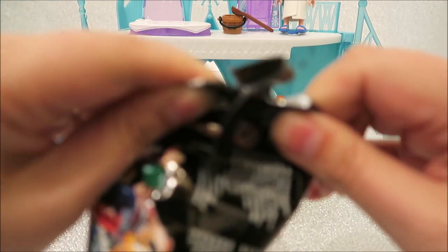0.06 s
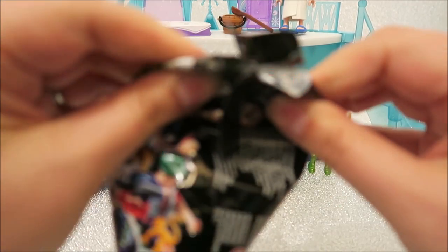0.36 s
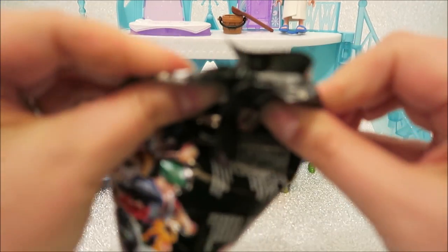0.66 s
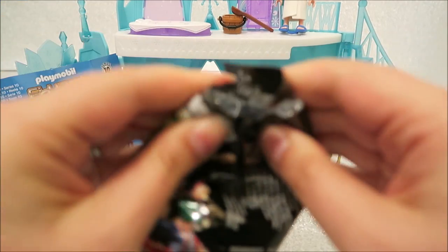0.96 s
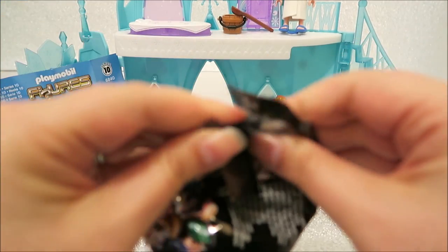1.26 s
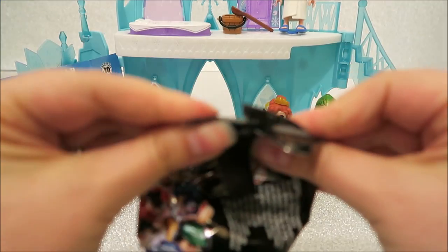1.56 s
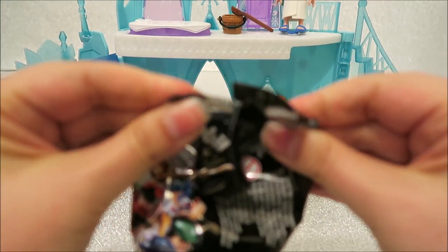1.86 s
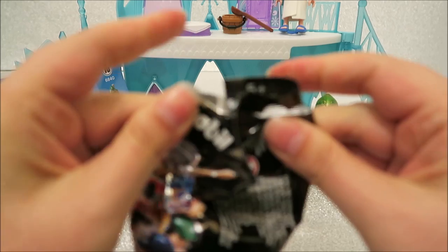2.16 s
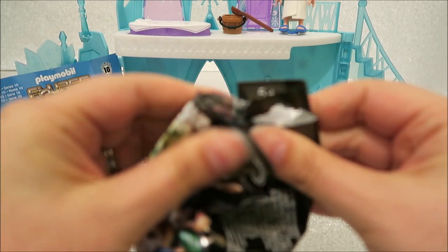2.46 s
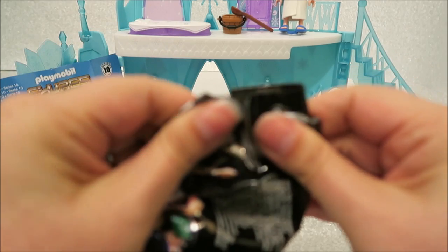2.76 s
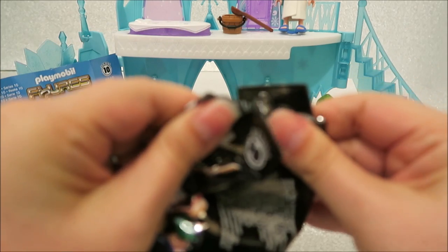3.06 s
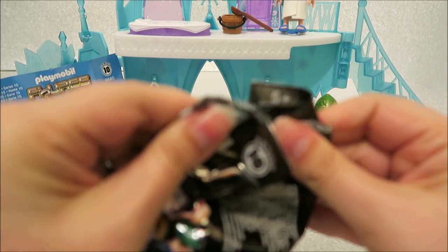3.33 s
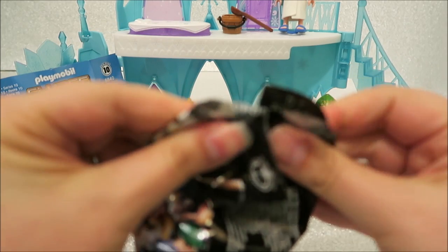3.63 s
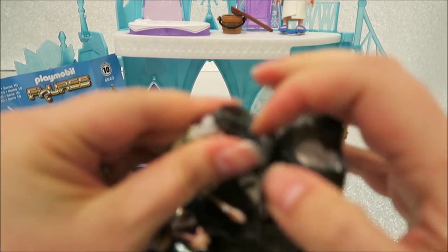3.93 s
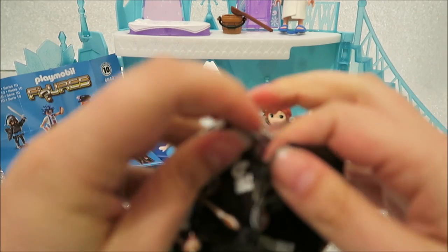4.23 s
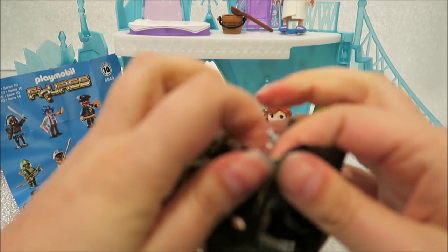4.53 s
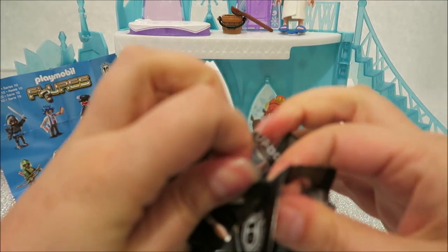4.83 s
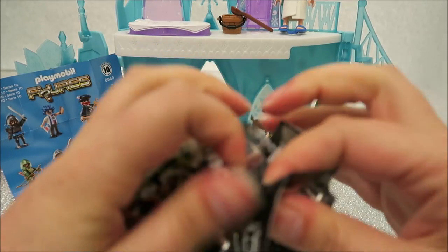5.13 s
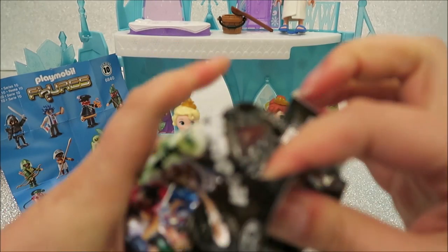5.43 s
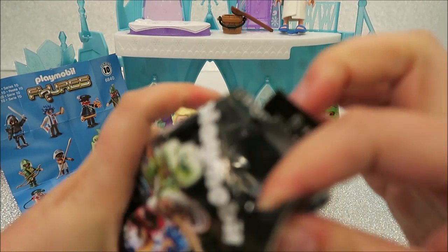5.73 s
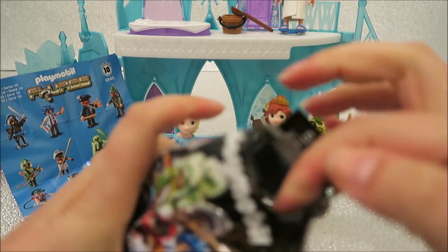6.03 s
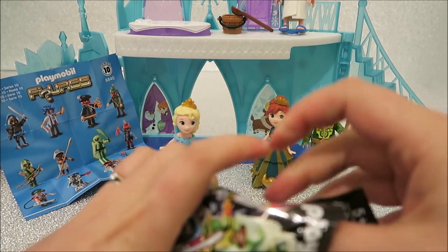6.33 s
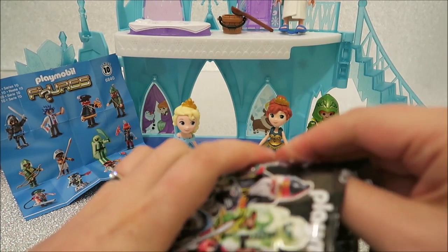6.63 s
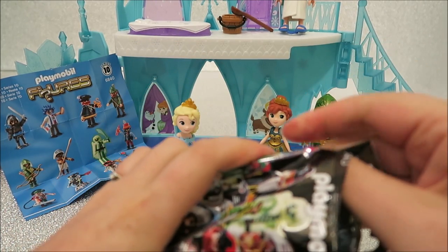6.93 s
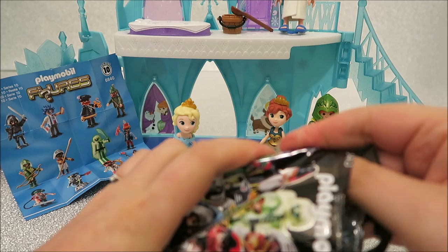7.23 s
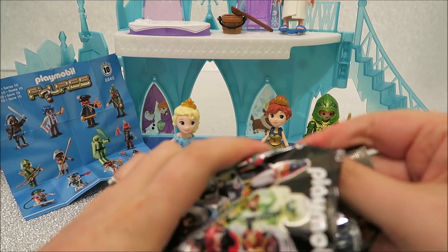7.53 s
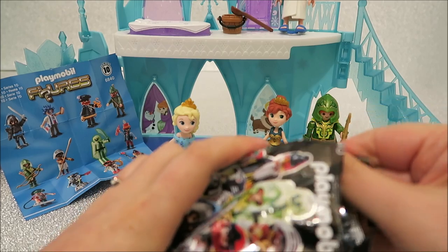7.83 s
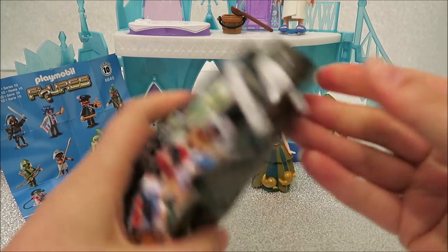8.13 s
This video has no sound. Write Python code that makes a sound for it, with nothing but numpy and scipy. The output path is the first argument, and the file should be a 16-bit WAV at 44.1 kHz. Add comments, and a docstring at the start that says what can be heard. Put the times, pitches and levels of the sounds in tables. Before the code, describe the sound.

Two hands pull open and fold a small foil packet close to the microphone. The foil crinkles from start to finish, with sharp, irregular snaps over lighter crackling, sliding rustle and soft finger bumps. The crackles come in clusters with brief quieter moments between them, some of the strongest arriving past the middle. The room is small, with still air and a faint low hum.

```python
"""A small foil packet is pulled open and folded by two hands, close up in a small room.
Its creases buckle in single snaps, each ringing the panel beside it. Between the snaps tiny wrinkles
pop, the film flexes, crackles and slides, and the fingers rub and bump the bag. The hollow between bag
and hands colours it all. The room answers each snap, over still air and a faint low hum."""
import sys
import numpy as np
from scipy import signal
from scipy.fft import rfft, irfft
from scipy.io import wavfile

SR = 44100
rng = np.random.default_rng(int(sys.argv[2]) if len(sys.argv) > 2 else 0)


def digitize_waveform(pressure):
    """Quantize a signal to 16-bit integers and store it at the path in sys.argv[1].

    Rows of a 2-D input are taken as channels; values are limited to [-1, 1].
    """
    field = np.atleast_2d(pressure).T
    bounded = np.clip(field, -1, 1)
    quanta = np.round(bounded * 32767).astype(np.int16)
    wavfile.write(sys.argv[1], SR, quanta)


N = 365148
SMALL_MAX_DB = -36.5  # ceiling that keeps small creases and wrinkles under the loud snaps

# where the hands hold the packet: (time [s], lead of the left microphone port and lag of the right [samples])
PACKET_PLACE = [(0, 1.7), (1.0, 1.94), (1.5, 2.5), (2.4, 1.8), (2.75, 0.4), (3.3, 1.2), (4.1, 1.24),
                (4.7, 1.3), (5.1, 2), (5.6, 2.5), (6.1, 0.06), (7.2, 0), (8.2, -0.5)]


def undb(db):
    """Decibels to gain."""
    return 10 ** (np.asarray(db) / 20)


def unit(x):
    """Scale to rms 1."""
    return x / np.sqrt(np.mean(x ** 2) + 1e-20)


def freqs(size):
    """Bin frequencies of a spectrum of size samples, floored at 1 Hz."""
    return np.maximum(np.fft.rfftfreq(size, 1 / SR), 1)


def along(points, hz):
    """Read (frequency [Hz], value) points on a log-frequency axis."""
    f, value = np.transpose(points)
    return np.interp(np.log(hz), np.log(f), value)


def causal(gain):
    """Minimum-phase spectrum with this gain: a sharp start, then a ring."""
    cepstrum = irfft(np.log(gain + 1e-9))
    half = len(cepstrum) // 2
    cepstrum[1:half] *= 2
    cepstrum[half + 1:] = 0
    return np.exp(rfft(cepstrum))


def colour(x, points, size=4096):
    """Give each channel a causal EQ of (frequency [Hz], gain [dB]) points."""
    response = irfft(causal(undb(along(points, freqs(size)))))
    return signal.fftconvolve(x, response[None], axes=1)[:, :N]


def add(out, s, sound):
    """Mix a stereo sound in at s seconds."""
    i = int(np.clip(s * SR, 0, N - 1))
    out[:, i:i + sound.shape[1]] += sound[:, :N - i]


def room_air(level_db=-65, width=0.51):
    """Still air: a soft bed of dark noise."""
    # tone of the air: (frequency [Hz], gain [dB])
    air_eq = [(21, 5), (62, 2), (125, -32), (260, 5), (720, -17), (2100, -13), (6100, -23), (13800, -36),
              (15500, -55)]
    noise = rng.standard_normal(N) + width * rng.standard_normal((2, N))
    return undb(level_db) * unit(colour(noise, air_eq))


def hum(hz=100.6, half_width_hz=6):
    """A faint low hum: a narrow band of noise that wavers, swells and fades."""
    # fader ride of the hum: (time [s], level [dB])
    ride = [(0, -71), (.4, -60.5), (2.2, -59), (2.5, -55), (3.2, -60), (4.1, -52), (5.9, -49.5), (6.7, -65),
            (7.0, -66), (8.28, -70)]
    band = 1 / (1 + ((freqs(N) - hz) / half_width_hz) ** 2)
    drone = unit(irfft(rfft(rng.standard_normal(N)) * band, N))
    return undb(np.interp(np.arange(N) / SR, *np.transpose(ride))) * drone


def room(x, wet_db=-8.5, build_s=0.00037, size=2 ** 15):
    """Diffuse answer of a small room: the treble dies first, the bass is alike in both channels."""
    # tone of the reverb: (frequency [Hz], gain [dB])
    reverb_eq = [(62, -29), (210, -11), (410, -2), (920, 2), (2100, 8), (4400, 4.5), (8100, 10), (13800, 7)]
    # length of its tail: (frequency [Hz], time to fall 60 dB [s])
    t60 = [(105, 0.73), (520, 0.38), (900, 0.38), (2100, 0.19), (6100, 0.21), (13800, 0.13)]
    f, t = freqs(size), np.arange(size) / SR
    mid, side = rfft(rng.standard_normal((2, size)))
    alike = 1 / (1 + (f / 1700) ** 2)
    field = mid * np.sqrt(1 + alike) + np.array([[1], [-1]]) * side * np.sqrt(1 - alike)
    field *= undb(along(reverb_eq, f))
    tail = np.zeros((2, size))
    for hz in 2. ** np.arange(6, 15):
        octave = np.maximum(1 - abs(np.log2(f / hz)), 0)
        tail += irfft(field * octave) * np.exp(-np.log(1000) * t / along(t60, hz))
    tail *= 1 - np.exp(-(t / build_s) ** 2)
    return signal.fftconvolve(x, unit(tail) / np.sqrt(size) * undb(wet_db), axes=1)[:, :N]


def microphone_ports(x, size=2 ** 19):
    """The two ports hear the near packet alike in the bass and nearly opposed in the treble."""
    # phase between the ports: (frequency [Hz], lead of the left [rad])
    phase = [(100, 0), (900, -.18), (1900, -.4), (2900, -1.0), (3600, -2.4), (7000, -3.0), (14000, -3.3)]
    turn = np.exp(.5j * np.array([[1], [-1]]) * along(phase, freqs(size)))
    return irfft(rfft(x, size) * turn)[:, :N]


def hollow(x, size=2 ** 19):
    """The hollow between bag and cupped hands resonates with the film."""
    # its resonances: (frequency [Hz], width [Hz], gain [dB])
    resonances = [(389.4, 32, 4.5), (460, 73, 0.5), (731.5, 65, 5.5), (910, 47, 3), (1014, 85, 2.5),
                  (1600, 40, 2), (3180, 200, -0.5)]
    f = freqs(size)
    gain_db = sum(db / (1 + (2 * (f - hz) / width) ** 2) for hz, width, db in resonances)
    return irfft(rfft(x, size) * causal(undb(gain_db)))[:, :N]


def rustle_burst(since, length, attack_s=0.0082, sag_db_per_s=5, release_db_per_s=339):
    """Envelope of one burst of rustle: it rises quickly, sags a little, and dies as the film settles."""
    rise = np.clip(1 + since / attack_s, 0, 1)
    sag_db = sag_db_per_s * np.clip(since, 0, length)
    release_db = release_db_per_s * np.maximum(since - length, 0)
    return rise * undb(-sag_db - release_db)


def hand_effort():
    """How hard rumble, flex, crackle and slide are driven: bursts of rustle on top of a light hold."""
    # the bag merely held: (time [s], finger rumble [dB], rustle [dB])
    grip = [(0.0, -63, -45), (0.45, -56, -44), (0.78, -52, -48), (1.25, -47, -40.5), (1.6, -49, -36.5),
            (1.9, -54, -57.5), (2.3, -39.5, -41), (2.7, -38.5, -35.5), (3.0, -46, -49), (3.65, -56, -48.5),
            (4.25, -44.5, -45), (5.35, -50, -44), (5.9, -39.5, -41), (6.12, -44, -52), (6.7, -47, -39),
            (7.15, -72, -52.5), (7.65, -57, -49), (8.28, -49.5, -51)]
    # trims on the hold, the last three on its rustle: (rumble [dB], flex [dB], crackle [dB], slide [dB])
    grip_trims = (-7, -8.5, -9.5, -11.5)
    # bursts of rustle, both longer squeezes and the brief rustle trailing a snap:
    # (start [s], length [s], rumble [dB], flex [dB], crackle [dB], slide [dB])
    bursts = [(0, 0.0049, -51, -34.5, -34, -34.5), (0.155, 0.0055, -66, -43, -41, -40),
              (0.248, 0.0063, -51, -49, -61, -47), (0.314, 0.11, -52, -55, -50, -47),
              (0.509, 0.02, -67, -50, -59, -44.5), (0.597, 0.046, -49, -31.5, -31.5, -29),
              (0.839, 0.084, -48.5, -35.5, -36.5, -41.5), (0.98, 0.015, -63, -51, -37, -31),
              (1.081, 0.019, -36, -28, -31, -37), (1.186, 0.01, -53, -37.5, -33, -38.5),
              (1.304, 0.24, -56, -49, -48.5, -46), (1.478, 0.071, -48.5, -38, -40, -33),
              (1.671, 0.005, -47, -30, -37, -37), (1.957, 0.12, -51, -44.5, -50.5, -52.5),
              (2.078, 0.065, -52, -38, -35.5, -32), (2.219, 0.046, -45, -38.5, -38, -38),
              (2.345, 0.092, -42, -37, -39, -38.5), (2.522, 0.11, -48, -32, -42.5, -41.5),
              (2.76, 0.023, -60, -39, -39, -35), (3.032, 0.0037, -61, -42.5, -29.5, -37),
              (3.098, 0.11, -61, -48, -37, -35.5), (3.396, 0.065, -62, -38.5, -31.5, -30),
              (3.557, 0.004, -44, -37.5, -33, -26), (3.692, 0.057, -49, -42, -45, -46),
              (3.759, 0.033, -39, -31.5, -31, -31), (3.941, 0.063, -38.5, -39, -37.5, -40),
              (4.077, 0.07, -48, -37.5, -42.5, -40), (4.32, 0.096, -44, -39.5, -45.5, -46.5),
              (4.47, 0.031, -38, -34.5, -40.5, -48), (4.621, 0.004, -43, -36.5, -39, -41),
              (4.781, 0.1, -30, -30.5, -37.5, -47), (4.898, 0.048, -62, -34.5, -49, -71),
              (5.076, 0.0045, -31, -24.5, -33, -48), (5.204, 0.03, -45, -41, -41, -42),
              (5.252, 0.035, -44.5, -39, -37.5, -39), (5.373, 0.037, -45, -40, -39, -47.5),
              (5.451, 0.13, -37, -31.5, -32.5, -42.5), (5.572, 0.018, -46, -24, -21, -24.5),
              (5.665, 0.056, -40.5, -38, -36.5, -42), (5.735, 0.0065, -30, -34, -26, -24),
              (6.003, 0.01, -48, -45, -43.5, -46.5), (6.184, 0.015, -42.5, -33.5, -45, -46.5),
              (6.311, 0.11, -46.5, -38.5, -39, -44), (6.505, 0.0041, -39, -28.5, -29, -29),
              (6.576, 0.0076, -38.5, -30, -28, -25.5), (6.66, 0.0068, -62, -32, -40, -44),
              (6.73, 0.009, -42, -42, -51, -31.5), (7.017, 0.039, -66, -43, -41.5, -36.5),
              (7.293, 0.0034, -63, -46, -48, -34.5), (7.354, 0.096, -64, -45.5, -47, -48.5),
              (7.731, 0.021, -45.5, -34.5, -42, -35.5), (7.843, 0.0048, -67, -41.5, -42.5, -45),
              (7.974, 0.141, -73, -51, -49.5, -53), (8.032, 0.024, -48, -33, -34.5, -36.5),
              (8.093, 0.068, -56, -41, -35.5, -40.5)]
    t = np.arange(N) / SR
    times, rumble_db, rustle_db = np.transpose(grip)
    rides = rumble_db, rustle_db, rustle_db, rustle_db
    hold_db = [np.interp(t, times, ride) + trim for ride, trim in zip(rides, grip_trims)]
    power = undb(hold_db) ** 2
    for start, length, *layer_db in bursts:
        near = slice(*np.searchsorted(t, [start - .01, start + length + .5]))
        power[:, near] += np.outer(undb(layer_db), rustle_burst(t[near] - start, length)) ** 2
    return np.sqrt(power)


def grains(eq, per_s, scatter_db, width, rub):
    """Tiny slips of unequal size in a bed of rubbing noise, a little different at each port."""
    hits = rng.random(N) < per_s / SR
    sizes = hits * undb(scatter_db * np.minimum(rng.exponential(size=N), 3.5))
    slips = unit(sizes * (np.sign(rng.standard_normal(N)) + width * rng.standard_normal((2, N))))
    rubbing = unit(rng.standard_normal(N) + width * rng.standard_normal((2, N)))
    return unit(colour(slips + rub * rubbing, eq))


def handling(effort, trim_db=(1, -2.3, -1.5, -.7)):
    """Fingers bump the bag, its walls flex, small wrinkles crackle and film slides over film."""
    # dull bump of the fingers: (frequency [Hz], gain [dB])
    rumble_eq = [(24, -29), (55, -2.5), (90, 2.5), (170, 1.5), (290, 1), (420, -2.5), (800, -42)]
    # midrange body of the flexing walls: (frequency [Hz], gain [dB])
    flex_eq = [(200, -17.5), (330, 0.5), (405, 9), (540, 8), (725, 6.5), (910, 7), (1150, 2.5), (1450, 4),
               (2400, -40), (13000, -43), (15500, -70)]
    # bite of the wrinkles: (frequency [Hz], gain [dB])
    crackle_eq = [(900, -12.5), (1600, 18.5), (2200, 16.5), (3200, 17.5), (4200, 18.5), (6500, -15.5),
                  (13000, -19), (15500, -60)]
    # sizzle of the sliding film: (frequency [Hz], gain [dB])
    slide_eq = [(3000, -29), (4700, -1.5), (6500, -2), (9000, -11), (11200, -9), (13500, -12), (15600, -66)]
    layers = (grains(rumble_eq, per_s=180, scatter_db=5.0, width=.27, rub=.56),
              grains(flex_eq, per_s=450, scatter_db=6.5, width=.3, rub=.96),
              grains(crackle_eq, per_s=620, scatter_db=4.6, width=.55, rub=.8),
              grains(slide_eq, per_s=1000, scatter_db=1.0, width=.55, rub=1.0))
    return sum(gain * undb(trim) * layer for gain, trim, layer in zip(effort, trim_db, layers))


def radiation(f, low_hz=135, soft_hz=7500, top_hz=13000):
    """A small sheet radiates little bass, and its very top is soft."""
    return 1 / (1 + (low_hz / f) ** 4) / np.hypot(1, f / soft_hz) / np.hypot(1, (f / top_hz) ** 7)


def wrinkle_pops(effort, per_s=65, low_hz=800, high_hz=6000, fade_s=.0015, scatter_db=5.5, size=512):
    """Tiny wrinkles pop one by one, each a short rough shiver with its own pitch."""
    f, t = freqs(size), np.arange(size) / SR
    out = np.zeros((2, N))
    for when, pitch, strength in rng.random((int(per_s * N / SR), 3)):
        hz = low_hz * (high_hz / low_hz) ** pitch
        shiver = (rng.standard_normal(size) + .3 * rng.standard_normal((2, size))) * np.exp(-t / fade_s)
        tone = radiation(f) / (1 + (f / hz - hz / f) ** 2)
        tick = irfft(rfft(shiver) * causal(tone))
        # low pops follow the flexing, middle ones the crackle, high ones the sliding
        gain = np.interp(pitch, [0, .5, 1], effort[1:, int(when * N)] * undb([-2.5, -1.0, -4.0]))
        gain *= undb(scatter_db * (2 * strength - 2))
        add(out, when * N / SR, unit(tick) * min(gain, undb(SMALL_MAX_DB)))
    return out


def buckle(f, t, shiver=.15, shiver_s=.0013, after=.61, after_per_s=1200, after_s=.002, width=.33):
    """Spectrum of a crease flipping: a kick, a shiver of the film, after-clicks of neighbouring folds."""
    fade = np.exp(-t / shiver_s)
    neighbours = (rng.random(len(t)) < after_per_s / SR) * np.exp(-t / after_s)
    kick = (t == 0) + (shiver * fade + after * neighbours) * rng.standard_normal(len(t))
    # only the short waves of the shiver differ between the ports
    spread = width / (1 + (1450 / f) ** 4)
    return rfft(kick) + spread * rfft(fade * rng.standard_normal((2, len(t))))


def panel(f, hz, resonances, ripple_db=3.6, resonance_q=5.5):
    """Gain of the panel beside a crease: a short, finger-damped ring among uneven modes."""
    # wide panels ring more and longer than small taut ones: (pitch [Hz], ring [dB], sharpness [Q])
    ring_by_pitch = [(400, 14, 5), (950, 16, 4.5), (2200, 4, 1.6), (4000, 6, 1.8), (7000, 5, 1.5)]
    ring_db, q = (along(np.array(ring_by_pitch)[:, [0, column]], hz) for column in (1, 2))
    ring = 1 + undb(ring_db) / np.hypot(1, q * (f / hz - hz / f))
    modes = np.c_[np.geomspace(100, 15500, 50), rng.standard_normal(50)]
    # a panel with strong resonances of its own has less chance unevenness
    uneven_db = ripple_db / np.sqrt(1 + len(resonances)) * along(modes, f)
    own_db = sum(db / (1 + (resonance_q * (f / at - at / f)) ** 2) for at, db in resonances)
    return ring * undb(uneven_db + own_db)


def snap(hz, band_db, lead, resonances=(), length_s=.005, size=2048):
    """A buckling crease rings its panel; band_db sets thud, panel, rattle and crack over length_s."""
    # borders of the thud, panel, rattle and crack bands: (frequency [Hz])
    band_edges = [100, 500, 1500, 4500, 15500]
    # flat core of each band's EQ: (from [Hz], to [Hz])
    band_cores = [(200, 380), (700, 1100), (1850, 3700), (7500, 9000)]
    # harder cracks reach higher: (crack level [dB], top of the sparkle [Hz])
    reach = [(-38, 12000), (-18, 13400)]
    f, t = freqs(size), np.arange(size) / SR
    top_hz = np.interp(band_db[-1], *np.transpose(reach))
    gain = panel(f, hz, resonances) * radiation(f, top_hz=top_hz)
    kick = buckle(f, t)
    bands = [(f >= lo) & (f < hi) for lo, hi in zip(band_edges, band_edges[1:])]
    energy = undb(band_db) ** 2 * SR * length_s
    for _ in range(3):  # share the energy out between the four bands
        power = np.mean(abs(kick * gain) ** 2, axis=0) * 2 / size
        log_boost = np.log(energy / [power[band].sum() for band in bands]) / 2
        gain *= np.exp(along(np.c_[np.ravel(band_cores), np.repeat(log_boost, 2)], f))
    delay_samples = 8 - lead * np.array([[1], [-1]])  # the nearer port hears the crease first
    return irfft(kick * causal(gain) * np.exp(-2j * np.pi * f / SR * delay_samples))


def small_creases(effort, per_s=11, low_hz=600, high_hz=6700, lift_db=(.7, 2.7, 5.7, .8), scatter_db=2.5):
    """Lesser creases give way at chance moments and pitches, as strong as the hands are busy."""
    out = np.zeros((2, N))
    for when, pitch, *chance in rng.random((int(per_s * N / SR), 6)):
        s = when * N / SR
        hz = low_hz * (high_hz / low_hz) ** pitch
        effort_db = 20 * np.log10(effort[:, int(when * N)])
        band_db = effort_db + lift_db + scatter_db * (2 * np.array(chance) - 1)
        lead = np.interp(s, *np.transpose(PACKET_PLACE))
        add(out, s, snap(hz, np.minimum(band_db, SMALL_MAX_DB), lead))
    return out


def loud_creases(trim_db=-0.98, wander_samples=.25):
    """Creases buckle in loud single snaps, each from its own spot near the hands; among them one low finger
    knock on the bag, at 4.884 s, is played the same way."""
    # snap cues, among them one low finger knock on the bag at 4.884 s: (time [s], panel pitch [Hz], thud [dB],
    # panel [dB], rattle [dB], crack [dB]), some followed by further peaks and notches of that panel: (frequency
    # [Hz], gain [dB])
    cues = [(0.0858,1710,-56,-39,-30.5,-42.5), (.1138,839,-57,-40,-45,-56), (0.1332,6980,-40,-38,-56,-40),
            (0.1547,3850,-39,-39,-29.5,-32), (0.23,3000,-39,-32,-24,-27.5,(7300,6)),
            (.2965,3100,-56,-52,-41,-47), (0.342,1890,-40,-30,-26,-33), (0.3201,980,-52,-38,-40,-50),
            (0.3702,1890,-56,-45,-44,-39.5), (.401,2100,-49,-44,-40,-56), (0.464,3270,-74,-64,-42,-48),
            (0.495,3170,-60,-45,-34,-35), (.5676,839,-47,-38,-45,-49), (0.5956,830,-35,-30.5,-33,-43),
            (0.6026,2600,-33,-31.5,-27,-40), (.63,2680,-28,-25,-18,-17.5,(720,7)),
            (0.793,3960,-63,-62,-41,-42), (0.825,4608,-43,-49,-34,-43), (0.8383,1380,-32,-34,-33,-56),
            (0.855,2780,-36,-45,-21.5,-21.5,(2800,8),(5700,7)), (0.8758,2220,-29.5,-32,-24.5,-36),
            (.923,910,-33,-28.5,-33,-54), (0.986,3700,-53,-56,-19,-28.5,(3850,8)),
            (1.0656,5500,-64,-35,-27.5,-27), (1.0845,360,-32,-34,-32,-36), (1.109,760,-86,-30,-31,-43),
            (1.183,3400,-55,-52,-29,-39), (1.1891,2970,-63,-29.5,-22,-28,(3050,7)),
            (1.2115,1080,-31,-22,-23.5,-41), (1.2875,775,-47,-37,-40,-52), (1.319,8650,-50,-42,-53,-34),
            (1.352,670,-34,-38,-35,-39), (1.396,404,-32,-34,-43,-59), (1.4261,2971,-41,-41,-26,-34),
            (1.4354,2960,-44,-33,-21,-38), (1.4626,1890,-42,-30,-18,-41),
            (1.4781,1840,-34,-17.5,-14.5,-18.5,(950,5),(3900,-6)), (1.5217,1030,-48,-18.5,-20,-24,(1900,5)),
            (1.6099,915,-38,-33,-33.5,-51), (1.6751,720,-47,-24.5,-32,-32),
            (1.6855,860,-16.5,-9,-22.5,-28.5,(1260,-7),(1560,9)), (1.75,861,-46,-34,-47,-62),
            (1.7767,860,-37,-36,-44,-66), (1.8016,861,-60,-51,-40.5,-60), (1.8535,1530,-50,-42,-36,-51),
            (1.8637,947,-56,-43,-49,-72), (1.9566,366,-35,-35,-37,-48), (1.9639,990,-39,-37,-50,-64),
            (2.0246,1540,-53,-39,-31,-38.5), (2.0501,1636,-53,-37,-39,-54),
            (2.0706,770,-37,-25.5,-27.5,-53), (2.078,1600,-45,-32,-26,-39),
            (2.0835,1500,-36,-23.5,-22.5,-36), (2.104,5200,-52,-40,-29,-27),
            (2.1162,8000,-56,-41,-28,-20.5), (2.1277,1580,-60,-30,-21.5,-31), (2.158,810,-43,-22,-63,-52),
            (2.19,3040,-48,-36,-27,-32), (2.228,11500,-46,-40,-42,-24), (2.2556,1670,-34,-30,-33,-39),
            (2.286,2880,-39,-48,-27,-57), (2.3483,1679,-47,-34,-24,-39,(2750,7)),
            (2.3527,790,-30,-21.5,-28,-32.5), (2.397,885,-39,-27,-41,-52), (2.411,1710,-36,-26,-22,-29),
            (2.4145,980,-34,-25,-25,-36), (2.4933,732,-43,-31.5,-42,-58), (2.547,735,-23,-27,-30.5,-48),
            (2.5727,1076,-38,-31,-39,-44), (2.5908,374,-24.5,-26.5,-21.5,-28),
            (2.5997,2240,-32,-34,-22.5,-27), (2.633,377,-24.5,-27.5,-40,-38), (2.672,386,-32,-43,-53,-55),
            (2.7219,1636,-48,-35,-33,-32.5), (2.774,3200,-49,-29,-26,-20),
            (2.7779,2250,-33.5,-22,-14,-19.5,(1300,-5),(2400,3)), (2.825,905,-48,-28,-47,-48),
            (2.834,1000,-27,-16.5,-14.5,-21.5,(1480,-12),(2900,8)), (2.899,6840,-37.5,-37,-37,-26.5),
            (2.95,1119,-48,-37,-46,-55), (2.9622,6000,-52,-46,-48,-43),
            (3.0372,5700,-63,-40.5,-25,-23.5,(2800,9),(5400,8)), (3.098,4200,-47,-25,-18,-22.5),
            (3.1189,3000,-33,-27,-12.5,-24,(700,6),(1150,-9)), (3.1627,1119,-52,-35,-33,-33),
            (3.178,6460,-52,-39,-27,-17.5,(1150,8)), (3.189,7050,-36.5,-27.5,-22,-22),
            (3.2826,2700,-63,-42,-30,-40), (3.325,2860,-47,-41,-26.5,-36,(2850,9),(3900,-6)),
            (3.354,4500,-42,-40,-33,-37.5), (3.397,2060,-35.5,-25,-17,-19.5,(5000,6)),
            (3.452,7750,-51,-48,-28,-28.5), (3.4795,1530,-35,-28.5,-27.5,-55),
            (3.5115,1184,-49,-37,-38,-47), (3.559,5670,-51,-27,-22,-21,(1700,6)),
            (3.714,410,-34,-44,-31,-39.5), (3.7475,1060,-30.5,-21,-24,-31), (3.785,1100,-41,-31,-32,-31),
            (3.8193,602,-48,-45,-40,-33), (3.88,990,-55,-45,-43,-53), (3.9545,910,-24,-21,-23.5,-27),
            (4.0479,990,-32.5,-31.5,-40,-49), (4.0985,1033,-48,-33,-39,-50),
            (4.1365,940,-28,-23.5,-26.5,-42), (4.254,5380,-75,-49,-51,-40), (4.2783,1550,-56,-54,-42.5,-39),
            (4.3345,740,-40,-33.5,-27,-34), (4.372,3160,-49,-59,-31.5,-36.5), (4.39,280,-51,-37,-46,-52),
            (4.467,735,-24.5,-28,-26,-42), (4.4933,1000,-42,-36,-39,-51), (4.5248,990,-41,-38,-42,-56),
            (4.5786,1033,-49,-41,-40.5,-54), (4.585,410,-31.5,-35,-45,-58),
            (4.6257,5200,-32.5,-24.5,-19,-23.5,(980,7),(3300,6)), (4.667,1000,-52,-39,-40,-56),
            (4.7392,2210,-59,-42,-30.5,-50), (4.7587,2840,-57,-39,-31,-38), (4.785,920,-17.5,-20,-26.5,-42),
            (4.85,168,-26,-49,-26.5,-54), (4.884,115,-19.5,-37,-40,-61), (4.9027,1119,-34,-30,-31,-55),
            (4.9385,408,-32,-32,-48,-68), (4.9571,2180,-32,-27.5,-21,-30.5,(1500,4),(4900,4)),
            (5.0727,934,-29,-15.5,-25.5,-33.5), (5.108,118,-27.5,-35,-46,-63),
            (5.207,670,-31,-23,-24.5,-32), (5.2485,900,-44,-22.5,-24,-43), (5.36,3980,-43,-43,-39,-46),
            (5.448,830,-20.5,-18.5,-29,-47,(550,-9)), (5.454,960,-29,-22.5,-21,-41),
            (5.5014,740,-35,-18,-17.5,-25), (5.5357,845,-47,-18,-23.5,-41), (5.568,694,-48,-26,-27,-32),
            (5.5782,1210,-19,-13,-18,-18), (5.6032,3250,-37,-16.5,-10.5,-13.5,(1300,4)),
            (5.693,394,-28,-29,-38,-45), (5.7355,5150,-38,-25.5,-22,-25), (5.743,915,-23.5,-23.5,-16,-24),
            (5.7454,2440,-34,-19.5,-17,-15.5,(850,6)), (5.8526,710,-50,-37,-47,-53),
            (5.887,3930,-39,-36.5,-32,-43.5), (5.9043,409,-35,-42,-43,-52), (5.9475,1981,-53,-47,-40,-55),
            (6.035,1410,-38,-29.5,-33,-45), (6.1011,452,-42,-40,-47,-68), (6.1394,845,-44,-36.5,-41.5,-53),
            (6.2019,660,-28,-27.5,-38,-39), (6.2942,775,-48,-45,-42,-52), (6.3106,1440,-69,-27,-26,-39),
            (6.39,2230,-61,-31,-26,-37,(2100,8)), (6.4136,1055,-46,-31,-37,-39),
            (6.5126,820,-52,-23,-26,-31), (6.5664,4730,-65,-27,-19.5,-19.5), (6.575,980,-42,-18,-19,-20),
            (6.5878,2680,-40,-18.5,-11,-17,(950,5),(1600,5)), (6.6643,463,-29,-29,-32,-50),
            (6.6964,1636,-41,-38,-29.5,-46), (6.7342,3000,-32,-19,-13,-18,(1050,5),(1500,-7)),
            (6.795,3420,-61,-36.5,-29,-38), (6.8483,860,-40,-31.5,-37,-48),
            (6.88,1530,-37.5,-33.5,-30.5,-45), (6.937,3800,-57,-41,-32.5,-48), (6.9688,452,-50,-48,-45,-52),
            (7.007,2890,-60,-39,-32,-47), (7.0229,2150,-51,-30.5,-23,-25,(2150,7),(3300,-5)),
            (7.049,900,-48,-35,-34,-42), (7.0705,336,-31.5,-31,-35,-51), (7.2096,2153,-60,-67,-45.5,-45),
            (7.232,2140,-76,-65,-44.5,-44), (7.2928,2800,-45,-26,-22,-27,(950,5),(1900,-8),(6200,6)),
            (7.361,2710,-45,-35,-32,-36.5), (7.38,790,-47,-28.5,-36,-54),
            (7.415,3300,-40,-30,-15,-22.5,(1950,7),(2350,-8)), (7.5012,2110,-45,-44,-42,-59),
            (7.5177,1378,-58,-47,-41.5,-72), (7.5825,410,-36,-37.5,-41,-75),
            (7.6219,2120,-49,-35.5,-30.5,-45), (7.6505,1076,-46,-42,-44,-44.5),
            (7.7241,2239,-58,-47,-37,-58), (7.7392,5300,-37.5,-36,-16,-18.5,(2400,7),(12500,5)),
            (7.7843,2000,-50,-38,-33,-59), (7.846,745,-40,-28,-28.5,-47),
            (7.946,3830,-53,-31,-26,-39,(1250,8),(3750,6)), (7.9923,780,-39,-23,-30.5,-48),
            (8.026,1000,-32,-32,-30,-39), (8.048,6850,-37,-30.5,-24.5,-23),
            (8.1313,3770,-45,-31,-22.5,-26.5), (8.1857,700,-38,-30.5,-29,-44)]
    out = np.zeros((2, N))
    for s, hz, thud_db, panel_db, rattle_db, crack_db, *resonances in cues:
        band_db = np.array([thud_db, panel_db, rattle_db, crack_db]) + trim_db
        lead = np.interp(s, *np.transpose(PACKET_PLACE)) + wander_samples * rng.standard_normal()
        add(out, s, snap(hz, band_db, lead, resonances))
    return out


def scene():
    """The packet close up and the room's answer, over air and hum."""
    effort = hand_effort()
    film = loud_creases() + handling(effort) + small_creases(effort) + wrinkle_pops(effort)
    packet = hollow(film)
    return microphone_ports(packet) + room(packet) + room_air() + hum()


def record(dry):
    """Peaks are held to full scale, and a steep low-pass cuts the very top."""
    lowpass = signal.ellip(8, .2, 70, 15400, fs=SR, output="sos")
    return signal.sosfilt(lowpass, np.clip(dry, -1, 1))


dry = scene()
out = record(dry)
digitize_waveform(out)
```